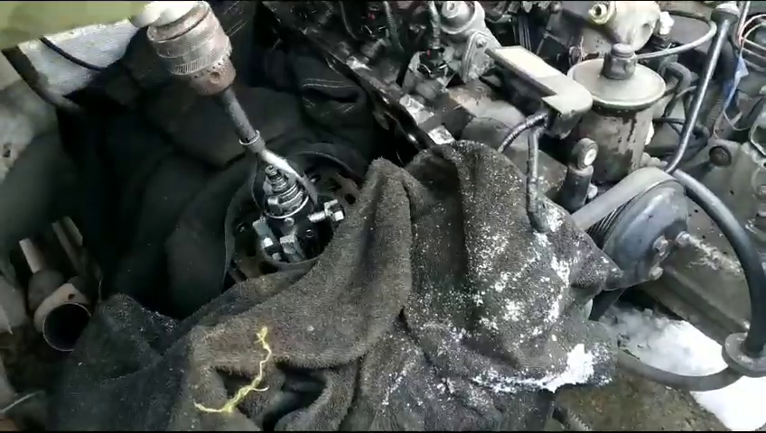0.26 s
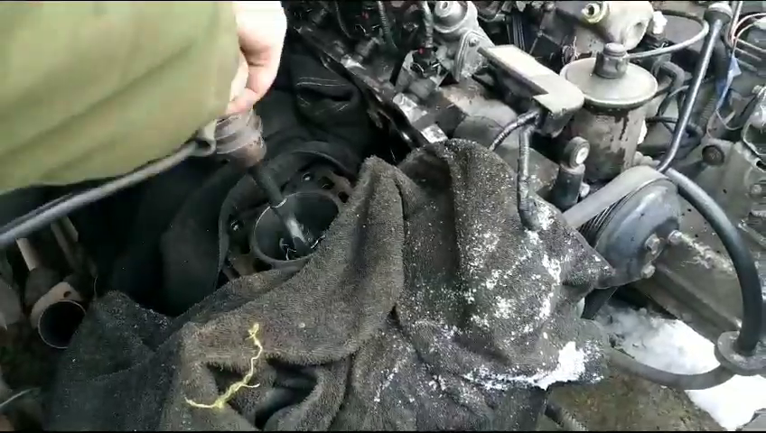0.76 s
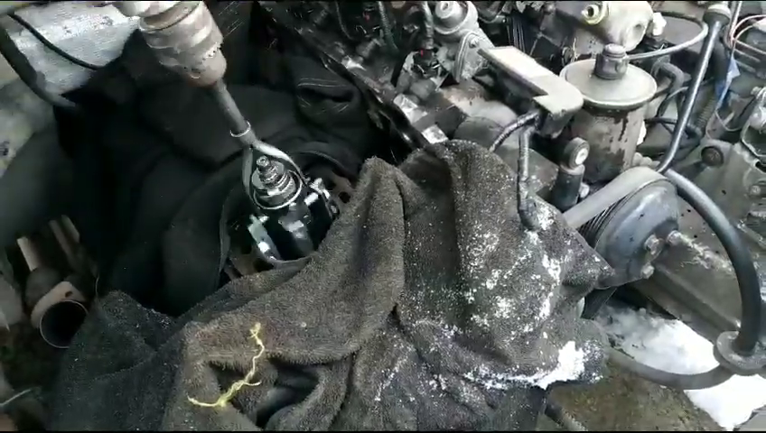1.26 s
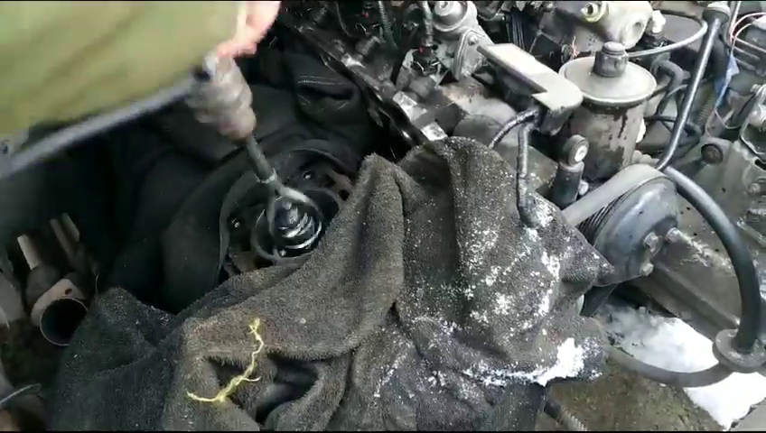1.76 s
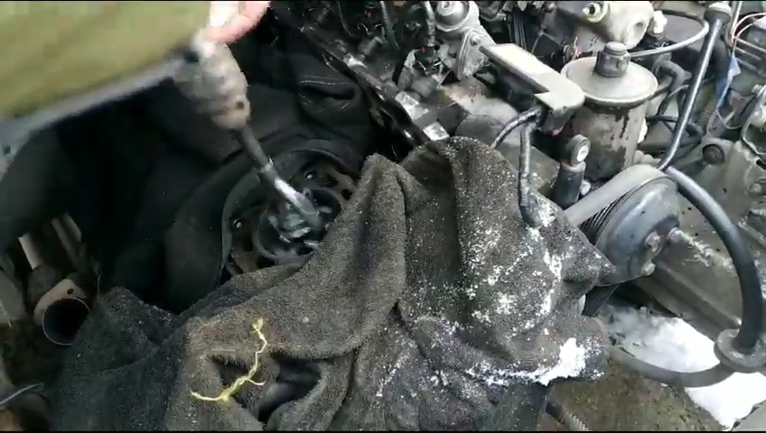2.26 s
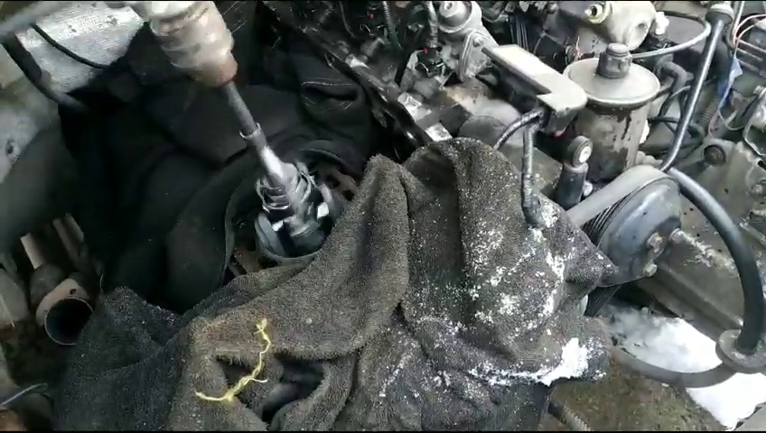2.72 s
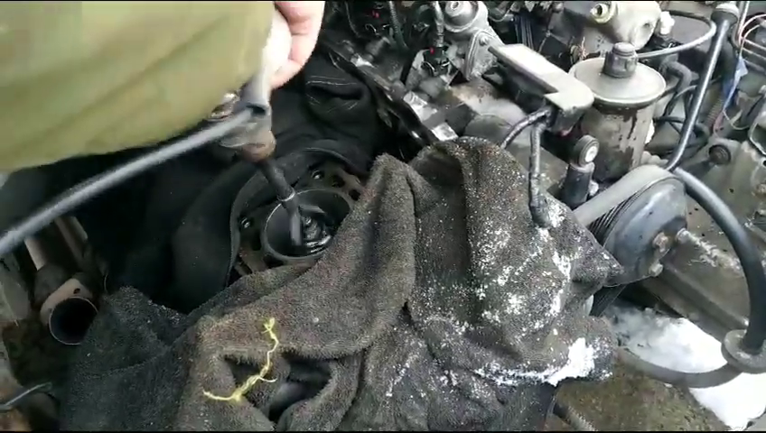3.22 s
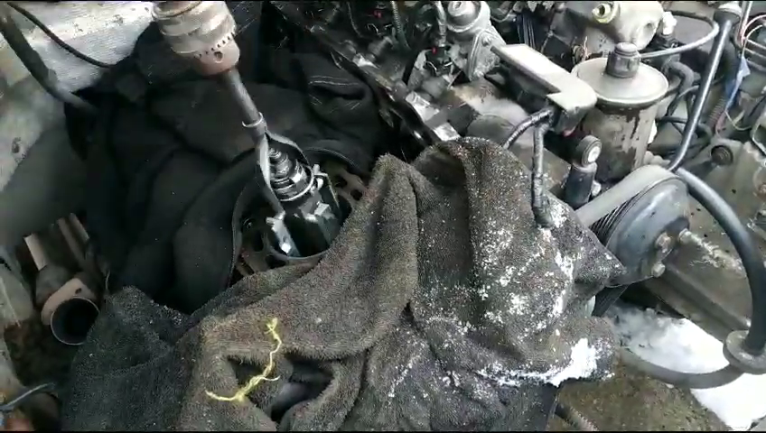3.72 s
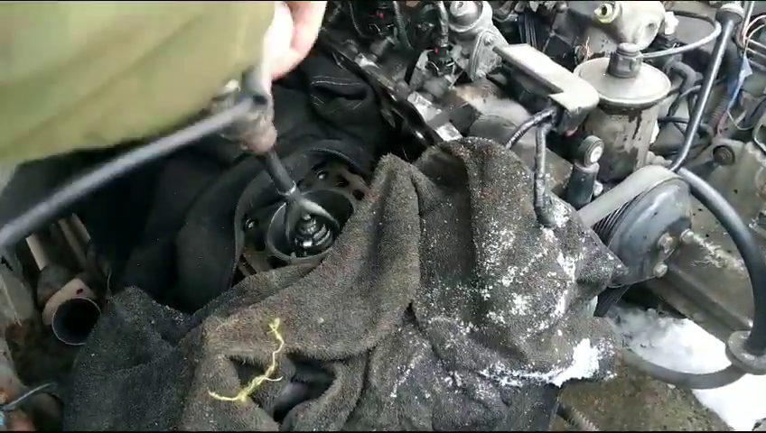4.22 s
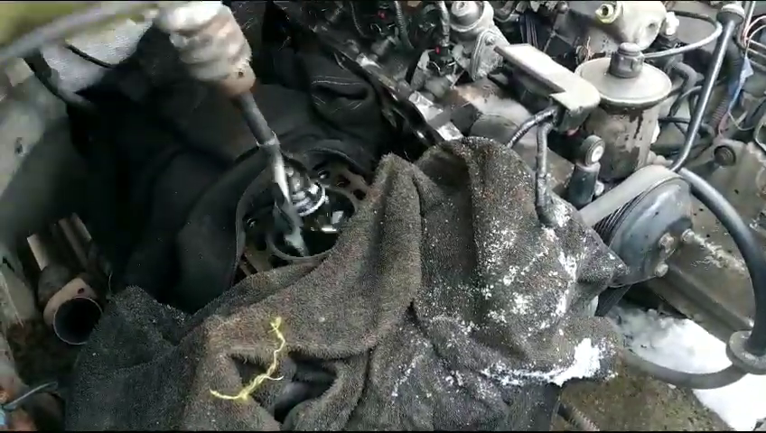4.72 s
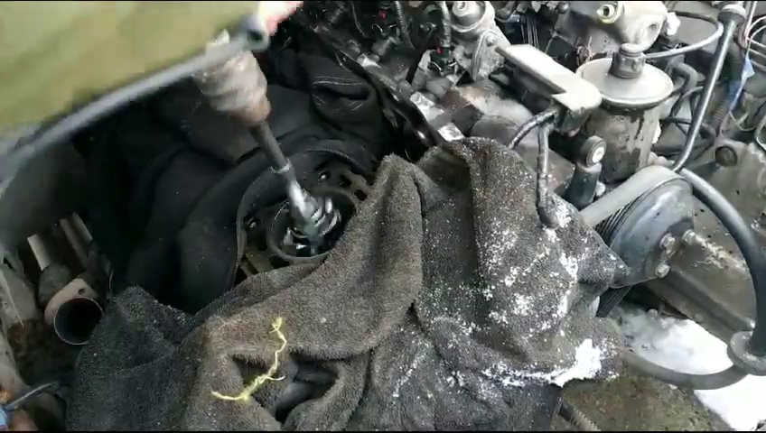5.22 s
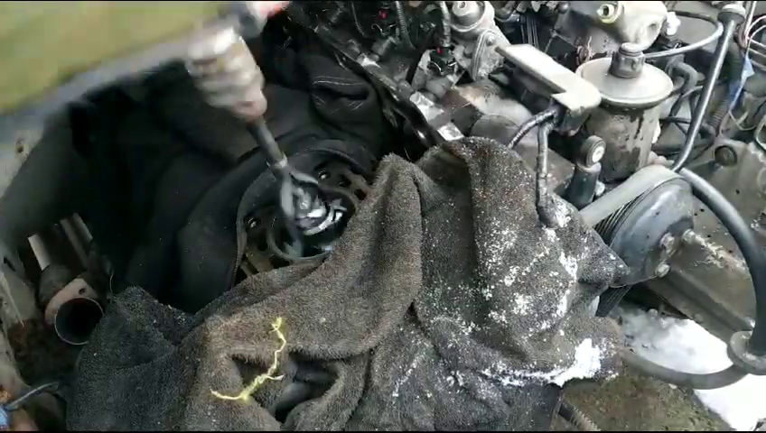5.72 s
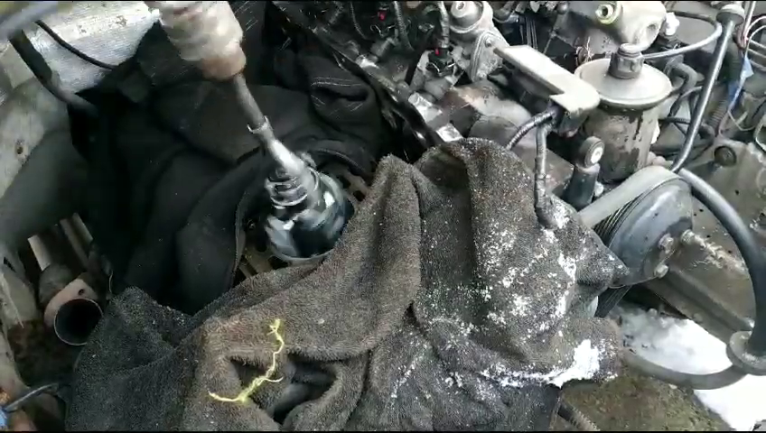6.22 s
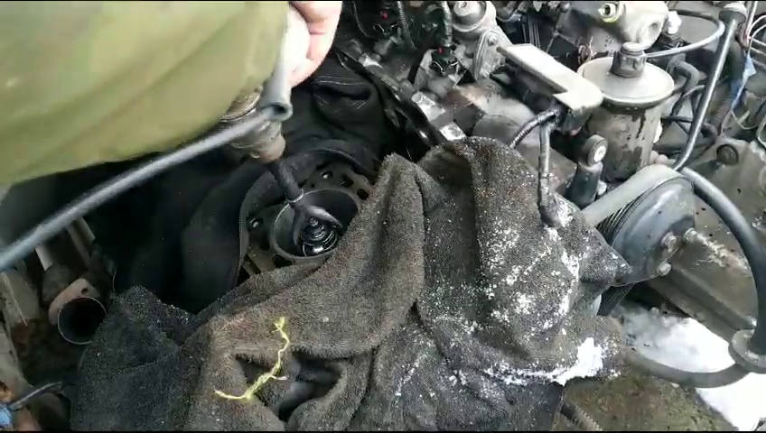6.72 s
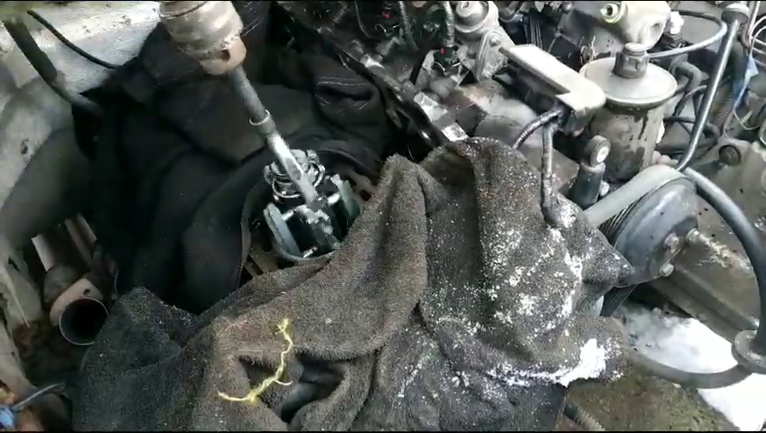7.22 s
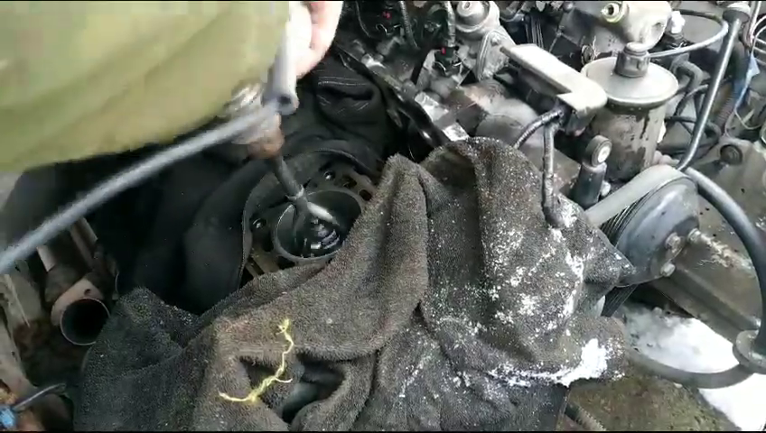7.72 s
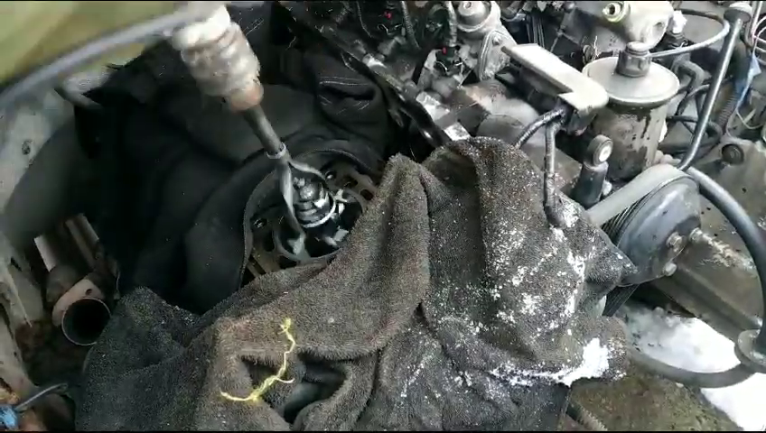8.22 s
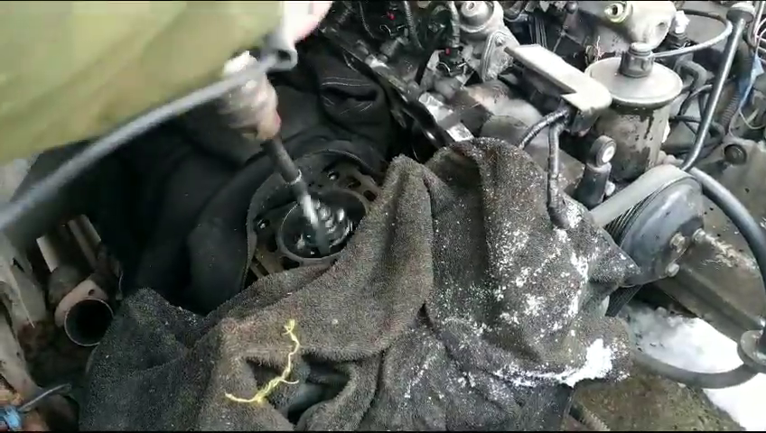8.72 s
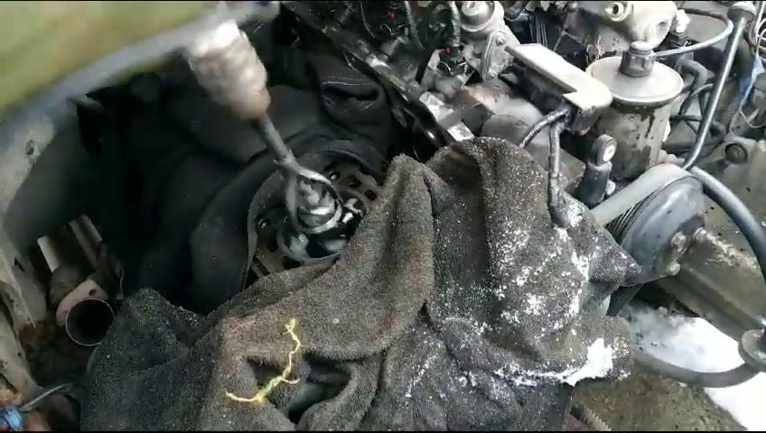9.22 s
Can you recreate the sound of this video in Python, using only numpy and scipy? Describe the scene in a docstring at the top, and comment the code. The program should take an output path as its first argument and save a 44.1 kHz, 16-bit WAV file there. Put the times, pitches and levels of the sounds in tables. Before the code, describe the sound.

Harsh, gritty drill bursts about every half second: quick rising gear whine, scraping abrasive stones, slower falling whine, small knocks between, in a quiet workshop.

```python
"""A gear whine already sliding down to a stop, then short blips of a corded drill spinning a stone hone in a bore.
Each trigger pull runs the motor up, one a stroke; friction brakes it, and the tooth rate sets every pitch of the whine.
Whine is summed sines; stones, loaded teeth, brushes and fan are shaped noise; the housing rings with it all.
Small knocks fall between blips. Two spaced microphone ports hear close metal echoes over a quiet workshop."""
import sys
import numpy as np
from scipy import signal
from scipy.fft import rfft, irfft, next_fast_len
from scipy.io import wavfile
from scipy.ndimage import uniform_filter1d

SR = 44100
rng = np.random.default_rng(int(sys.argv[2]) if len(sys.argv) > 2 else 0)


def unload_audio(sound):
    """Save the sound as a 16-bit wav file, at the path given as the first command line argument."""
    columns = np.transpose(np.atleast_2d(sound))
    # keep every value between -1 and 1, then stretch to whole-number steps
    steps = np.round(np.clip(columns, -1, 1) * 32767)
    wavfile.write(sys.argv[1], SR, steps.astype(np.int16))


N = 417186  # samples

# Trigger blips: press_s, release_s, tooth_rate_at_release_hz, braking_hz_per_s, braking_ease_hz_per_s2
TRIGGER_PULLS = [(-0.25, -0.152, 1240, 3448, 0), (0.338, 0.451, 1254, 3010, 800),
                 (0.889, 1.003, 1275, 2884, 0), (1.52, 1.653, 1310, 2750, 0), (2.078, 2.168, 1194, 2791, 0),
                 (2.68, 2.795, 1297, 2905, 330), (3.233, 3.321, 1166, 2804, 450),
                 (3.833, 3.94, 1234, 3175, 1300), (4.4, 4.46, 1022, 2702, 800),
                 (4.991, 5.116, 1283, 3224, 1330), (5.563, 5.666, 1288, 3046, 450),
                 (6.174, 6.312, 1389, 2858, 0.5), (6.75, 6.857, 1300, 3033, 0),
                 (7.331, 7.445, 1372, 3120, 950), (7.9, 7.959, 972.3, 2620, 550.5),
                 (8.490, 8.595, 1271, 3014, 999), (9.037, 9.131, 1251, 2874, 503)]
# Partials of the tooth whine: multiple_of_tooth_rate, level_db (before gear case and housing)
WHINE_PARTIALS = [(1, -2), (2, -4.5), (3, 0), (4, -5), (5, -2.5), (6, -1.5), (7, 0), (8, -6.5), (9, -1.5),
                  (10, -8), (11, -10), (12, 0.5), (13, -8.5), (14, 1)]
# How the gear case favours the whine: frequency_hz, gain_db
GEAR_CASE = [(400, -6.5), (1000, -1.5), (1600, 6.5), (2700, 3), (3500, -3.5), (6300, -2), (7600, 1.5),
             (10000, -5)]
# How drill and engine block radiate: frequency_hz, gain_db
BODY_COLOUR = [(35, -90), (60, -86), (222, -35), (363, -22.5), (492, -15.5), (862, -13.5), (1380, -6.5),
               (2000, -5.5), (2190, -1.5), (2840, -9), (5860, -6.5), (6900, -14), (7570, -1), (10500, -15),
               (16000, -13)]
# Housing and bore resonances: centre_hz, width_hz, rise_db (negative dips)
RESONANCES = [(210, 38, 8.5), (685, 56, 7.5), (837, 140, 9), (1480, 79, 4), (1800, 70, 4.5),
              (2180, 170, 1.5), (2640, 320, 3), (3450, 76, 3), (5815, 270, -7.5), (7740, 51, 3),
              (7360, 66, 2.5), (9450, 380, 4), (11500, 500, 5), (13460, 100, -9)]
# Left port relative to right port: frequency_hz, difference_db
PORT_DIFFERENCE = [(60, 5), (110, -20), (200, -1.5), (380, -2), (700, -1), (1290, -2.5), (2380, 11.5),
                   (4400, -2), (8120, 4), (15000, -4)]
# Knocks of tool and switch: start_s, level_db (before ports and echoes), pitch_hz
TOOL_KNOCKS = [(0.282, -59, 797), (0.312, -42, 523), (2.638, -46, 676), (3.789, -43, 439.5),
               (3.826, -32, 2630), (4.939, -47, 636), (6.119, -45, 436), (8.429, -39.5, 660),
               (8.456, -45, 864)]
# Spectrum of the workshop air: frequency_hz, relative_density_db
SHOP_COLOUR = [(29, -59), (50, -68), (155, -7), (246, 0.5), (1910, -15.5), (2110, -18.5), (6870, -21.5),
               (10900, -24.5), (12600, -22), (13800, -23), (16000, -22)]
# Noise colours and the part of the air unlike at each port: frequency_hz, gain_db
SHOP_OWN_COLOUR = [(300, -9.5), (2000, 4.5)]
BRUSH_COLOUR = [(500, 9.5), (4000, -3.5), (14000, 2)]
RATTLE_COLOUR = [(300, 9), (2000, -2.5), (12000, -9.5)]
GRIT_COLOUR = [(200, 18.5), (1000, 0.5), (4000, 0.5), (14000, -10.5)]

PINION_TEETH, ARMATURE_SLOTS, WHEEL_TEETH = 7, 12, 33
RUN_UP_S, SLACK_S = 0.075, 0.033  # time constants of motor run-up and gear slack
DRILL_RMS_DB, SHOP_RMS_DB = -19, -51  # before ports, echoes and output filters
LEFT_LAG_SAMPLES = 13
ECHO_T60_S, SHOP_T60_S, SHOP_TAIL_DB = 0.039, 0.27, -26  # close metal; far walls and their starting level
ECHO_LOW_CUT_HZ, ECHO_DB, WHINE_ECHO_DB = 1204, 3, -4
ECHO_SETS, ECHO_SHIFTS_PER_S = 12, 14
HEADROOM, LOW_CUT_HZ, TOP_HZ = 0.95, 115, 15900  # soft ceiling (linear), output band edges


def undb(db):
    """Decibels to gain."""
    return 10 ** (np.asarray(db) / 20)


def unit(x):
    """Scale to rms 1."""
    return x / np.sqrt(np.mean(x ** 2))


def shape(x, table, share=1):
    """Filter by gain points joined on a log-frequency axis; share scales the decibels."""
    point_hz, point_db = np.transpose(table)
    size = next_fast_len(N)
    f = np.arange(size // 2 + 1) * SR / size + 1  # 1 Hz offset avoids log of zero
    gain_db = np.interp(np.log(f), np.log(point_hz), point_db)
    return irfft(rfft(x, size) * undb(share * gain_db), size)[..., :N]


def per_turn(turns, spread_db):
    """A random gain that glides to a new value at each whole turn."""
    count = int(turns[-1]) + 2
    values = rng.standard_normal(count)
    return undb(spread_db * np.interp(turns, np.arange(count), values))


def loud(hz, knee_hz, power):
    """Gain that grows with speed and flattens above a knee."""
    return (hz / (hz + knee_hz)) ** power


def shop():
    """Steady workshop air: noise common to both ports, plus noise of each port's own that is weaker in the bass."""
    both = rng.standard_normal(N)
    own = shape(rng.standard_normal((2, N)), SHOP_OWN_COLOUR)
    return undb(SHOP_RMS_DB) * unit(shape(both + own, SHOP_COLOUR))


def echoes(x):
    """Dense decaying reflections off near metal and far walls, unlike at each port, changing as the drill moves."""
    t = np.arange(SR // 4) / SR
    metal = np.exp(-np.log(1000) * t / ECHO_T60_S)
    walls = undb(SHOP_TAIL_DB) * np.exp(-np.log(1000) * t / SHOP_T60_S)
    tails = rng.standard_normal((ECHO_SETS, 2, len(t))) * (metal + walls)
    tails = signal.lfilter(*signal.butter(4, ECHO_LOW_CUT_HZ, "high", fs=SR), tails)
    place = np.arange(N) / SR * ECHO_SHIFTS_PER_S
    wet = 0
    for k, tail in enumerate(tails):
        # each set of paths swells and fades in turn, round and round
        distance = np.abs((place - k + ECHO_SETS / 2) % ECHO_SETS - ECHO_SETS / 2)
        share = np.cos(np.pi / 2 * np.clip(distance, 0, 1))
        even_tail = tail / np.sqrt(np.sum(tail ** 2) / 2)
        wet = wet + signal.oaconvolve((x * share)[None], even_tail, axes=1)
    return undb(ECHO_DB) * wet[:, :N]


def knocks():
    """Short dull rings of tool and switch: a dying sine with a faster burst of noise at the strike."""
    out, t = np.zeros(N), np.arange(1500) / SR
    for start_s, level_db, pitch_hz in TOOL_KNOCKS:
        strike = 0.83 * rng.standard_normal(len(t)) * np.exp(-t / 0.0025)
        ring = np.sin(2 * np.pi * pitch_hz * t) + strike
        first = int(start_s * SR)
        out[first:first + len(t)] += undb(level_db) * ring * np.exp(-t / 0.0085)
    return out


def housing(x):
    """Broad radiation colour with narrow resonances raised or dipped on top."""
    x = shape(x, BODY_COLOUR)
    rung = x
    for centre_hz, width_hz, rise_db in RESONANCES:
        peak = signal.iirpeak(centre_hz, centre_hz / width_hz, SR)
        rung = rung + (undb(rise_db) - 1) * signal.lfilter(*peak, x)
    return rung


def brushes(hz, teeth):
    """Brush and fan hiss: shaped noise, strongly tied to speed and uneven from one pinion turn to the next."""
    hiss = rng.standard_normal(N) * per_turn(teeth / PINION_TEETH, 0.67)
    return undb(12.0) * loud(hz, 770, 2.02) * shape(hiss, BRUSH_COLOUR)


def rattle(teeth, torque):
    """Loaded teeth rattle: noise that follows the torque, each contact with its own force."""
    contact = per_turn(teeth, 3.3) * rng.standard_normal(N)
    return undb(8.0) * torque ** 0.35 * shape(contact, RATTLE_COLOUR)


def stones(hz, teeth):
    """Grit scraping the bore: grainy noise that pulses with the teeth and swells round each spindle turn."""
    tooth_pulse = 1 + 0.51 * np.cos(2 * np.pi * teeth)
    grit = rng.standard_normal(N) * per_turn(teeth * 3, 4.1) * tooth_pulse
    # 2.8 new swells per wheel turn, and one per pinion turn
    swell = per_turn(teeth / WHEEL_TEETH * 2.8, 1.23) * per_turn(teeth / PINION_TEETH, 1.0)
    return undb(7) * loud(hz, 330, 1.81) * swell * shape(grit, GRIT_COLOUR)


def whine(hz, teeth):
    """Tooth whine wobbled by the pinion's run-out, each partial's level drifting by wheel turn, plus slot tone."""
    run_out = 0.06 * np.sin(2 * np.pi * teeth / PINION_TEETH)  # radians
    angle = 2 * np.pi * teeth + run_out
    tones = np.zeros(N)
    for multiple, level_db in WHINE_PARTIALS:
        drift = per_turn(teeth / WHEEL_TEETH, 2.65)
        phase = rng.uniform(0, 2 * np.pi)
        tones += undb(level_db) * drift * np.sin(round(multiple) * angle + phase)
    slots = undb(-12) * np.sin(2 * np.pi * teeth * ARMATURE_SLOTS / PINION_TEETH)
    return undb(2) * shape(loud(hz, 200, 3.23) * (tones + slots), GEAR_CASE)


def motor():
    """Tooth rate in Hz and relative torque: an exponential run-up while pressed, then braking that may ease."""
    t = np.arange(N) / SR
    hz, torque = np.zeros(N), np.zeros(N)
    for press_s, release_s, top_hz, brake, ease in TRIGGER_PULLS:
        now = t >= press_s
        pressed = t[now] < release_s
        since = t[now] - press_s
        coast = np.maximum(t[now] - release_s, 0)
        start_hz = hz[np.argmax(now)]  # speed left from the previous blip
        run_up = np.expm1(-since / RUN_UP_S) / np.expm1(-(release_s - press_s) / RUN_UP_S)
        rise = start_hz + (top_hz - start_hz) * run_up
        # the running minimum keeps the easing from speeding the drill up again
        fall = np.minimum.accumulate(top_hz - brake * coast + ease * coast ** 2)
        hz[now] = np.where(pressed, rise, np.maximum(fall, 0))
        # torque takes a moment to close the gear slack, then fades as the motor gains speed
        torque[now] = pressed * -np.expm1(-since / SLACK_S) * np.exp(-since / RUN_UP_S)
    return hz, np.abs(uniform_filter1d(torque, size=200))


def scene():
    """Drill and knocks reach the right port first; the whine, from one compact source, echoes less than the rest."""
    hz, torque = motor()
    teeth = np.cumsum(hz) / SR  # teeth passed so far
    friction = rattle(teeth, torque) + stones(hz, teeth) + brushes(hz, teeth)
    tone, noise = housing(np.array([whine(hz, teeth), friction]))
    gain = undb(DRILL_RMS_DB) / np.std(tone + noise)
    tone, noise = gain * tone, gain * noise + knocks()
    right = tone + noise
    left = np.concatenate([np.zeros(LEFT_LAG_SAMPLES), right[:-LEFT_LAG_SAMPLES]])
    # half the port difference goes to each side
    direct = np.array([shape(left, PORT_DIFFERENCE, share=1 / 2), shape(right, PORT_DIFFERENCE, share=-1 / 2)])
    return direct + echoes(noise + undb(WHINE_ECHO_DB) * tone) + shop()


def record(dry):
    """Round the loudest peaks, drop the deep bass and cut the top steeply."""
    soft = HEADROOM * np.tanh(dry / HEADROOM)
    low_cut = signal.butter(3, LOW_CUT_HZ, "high", fs=SR, output="sos")
    top_cut = signal.ellip(10, 0.2, 80, TOP_HZ, fs=SR, output="sos")
    return signal.sosfilt(top_cut, signal.sosfilt(low_cut, soft))


dry = scene()
out = record(dry)
unload_audio(out)
```